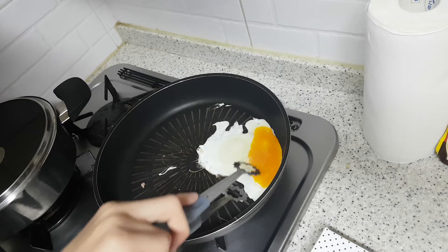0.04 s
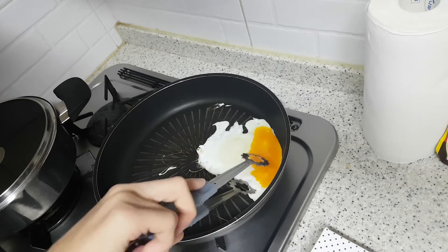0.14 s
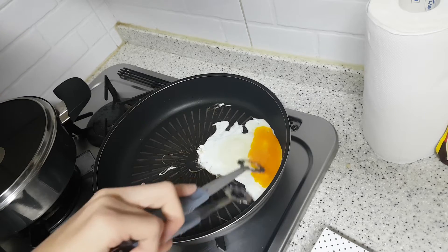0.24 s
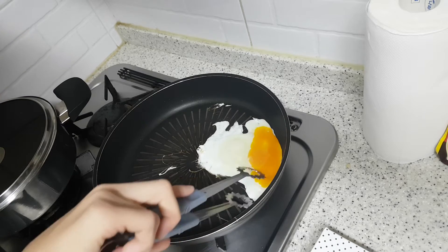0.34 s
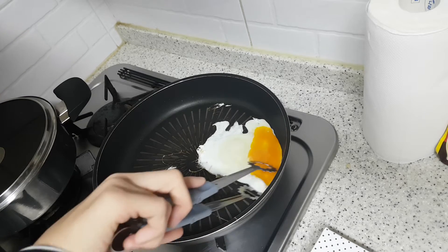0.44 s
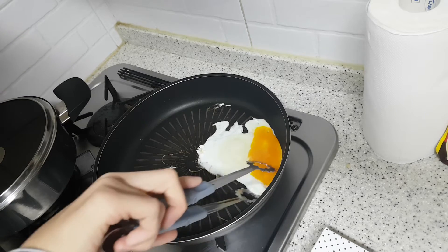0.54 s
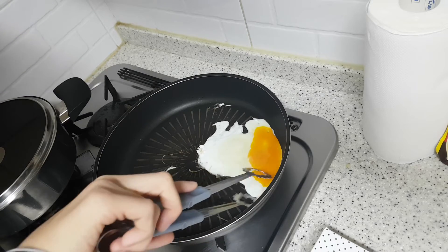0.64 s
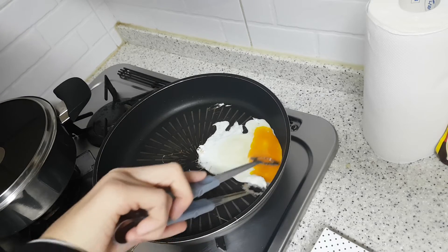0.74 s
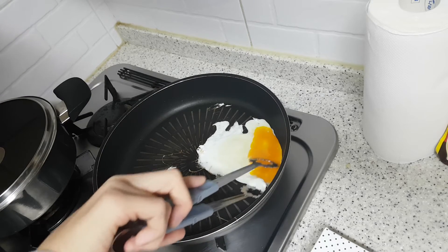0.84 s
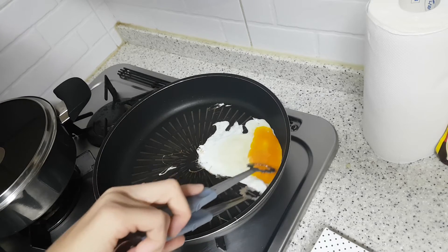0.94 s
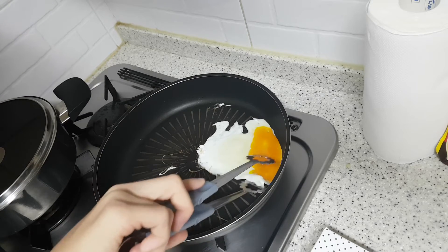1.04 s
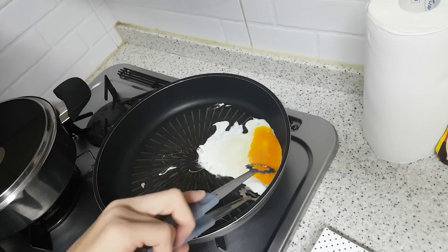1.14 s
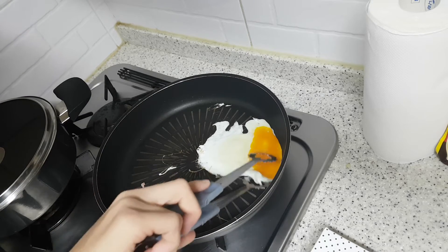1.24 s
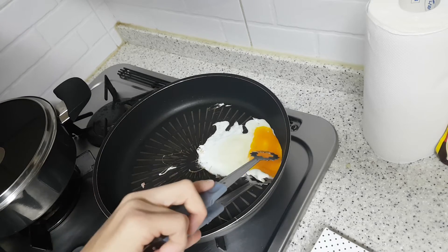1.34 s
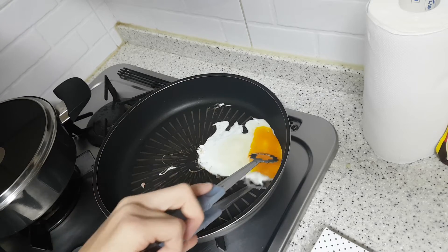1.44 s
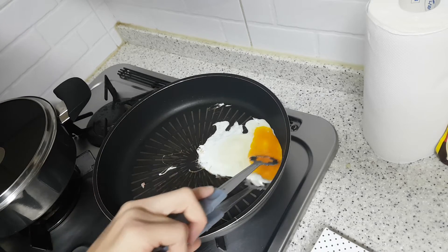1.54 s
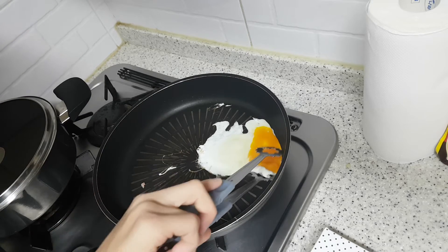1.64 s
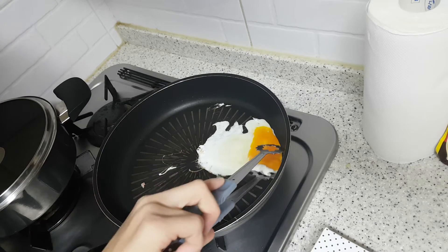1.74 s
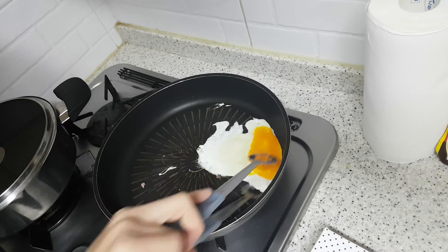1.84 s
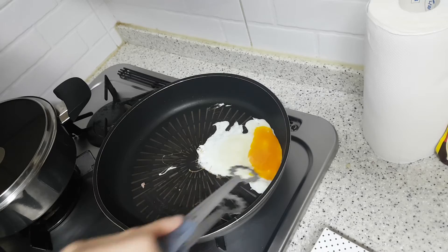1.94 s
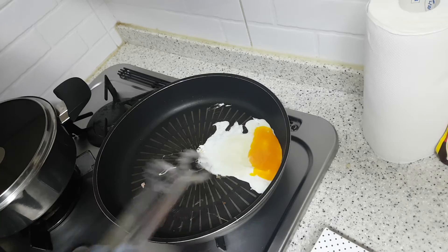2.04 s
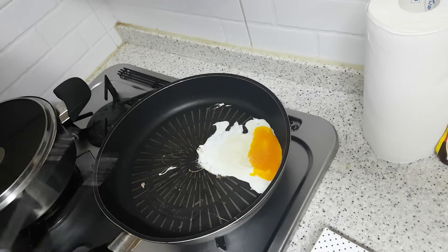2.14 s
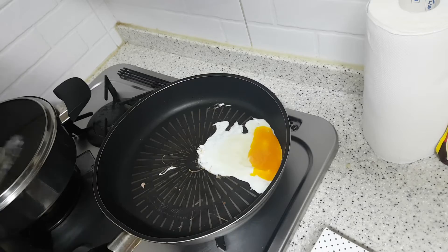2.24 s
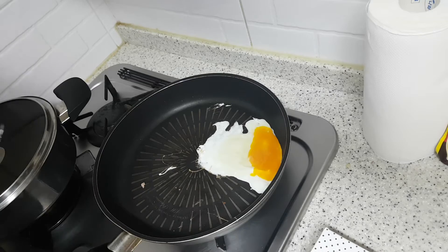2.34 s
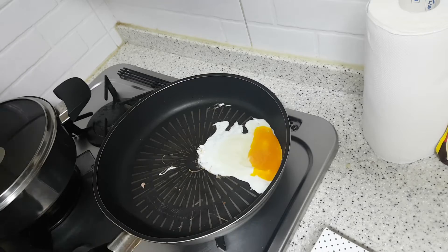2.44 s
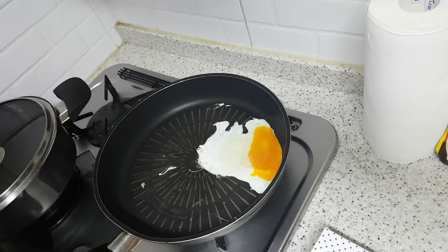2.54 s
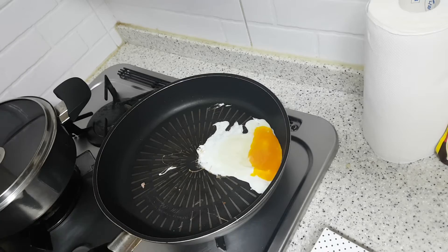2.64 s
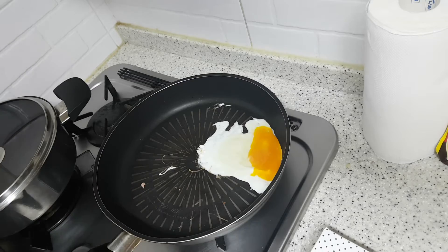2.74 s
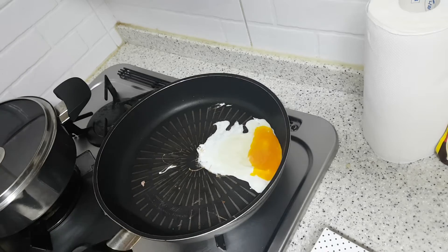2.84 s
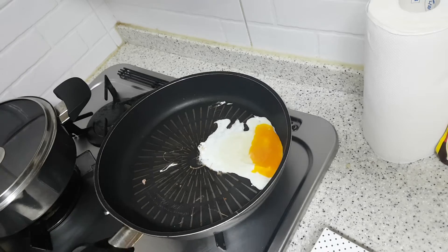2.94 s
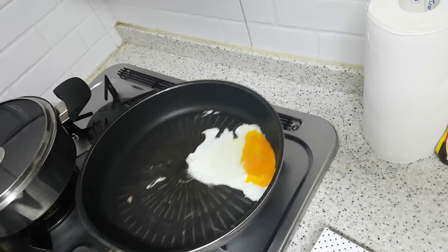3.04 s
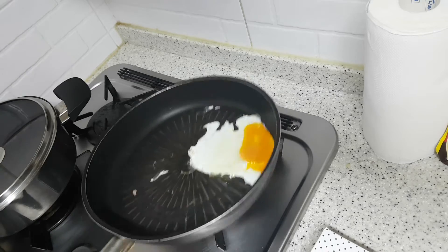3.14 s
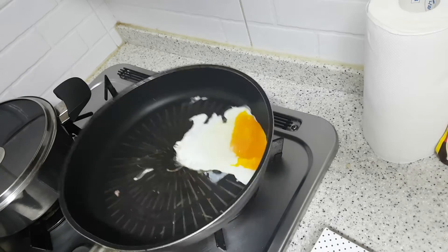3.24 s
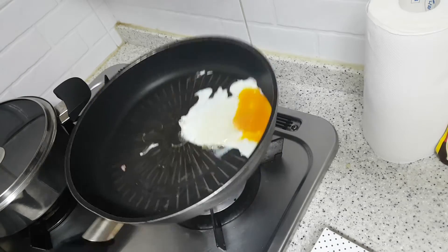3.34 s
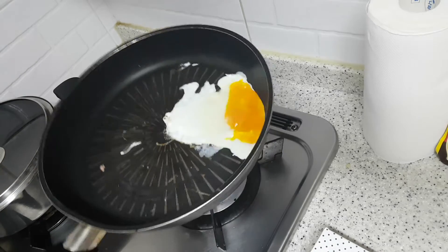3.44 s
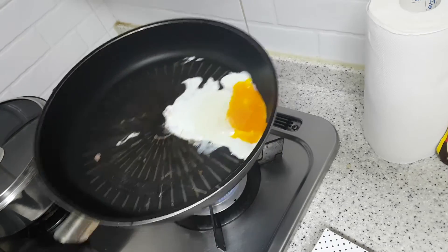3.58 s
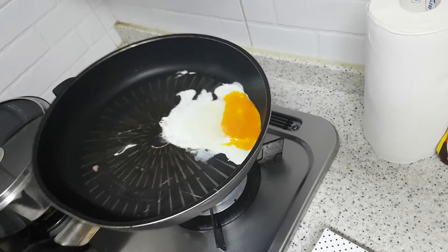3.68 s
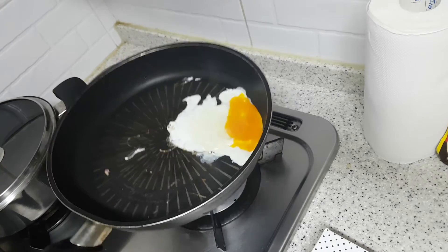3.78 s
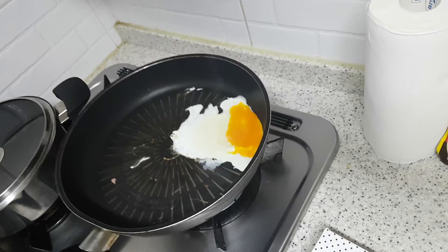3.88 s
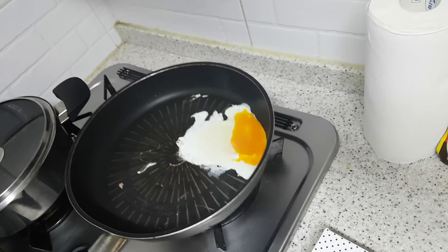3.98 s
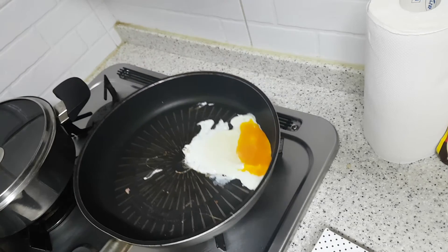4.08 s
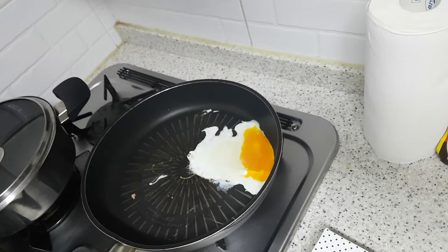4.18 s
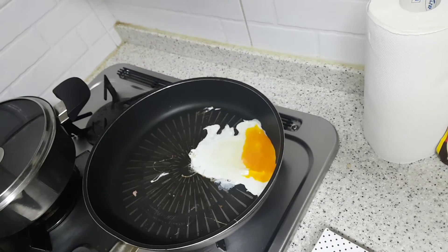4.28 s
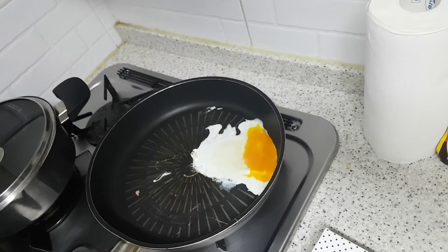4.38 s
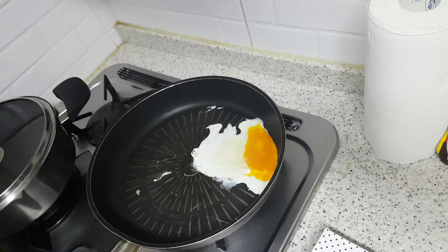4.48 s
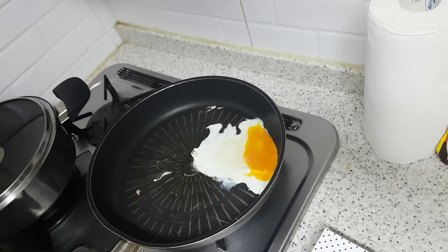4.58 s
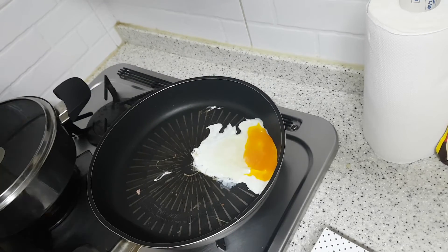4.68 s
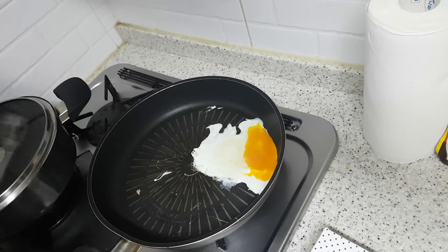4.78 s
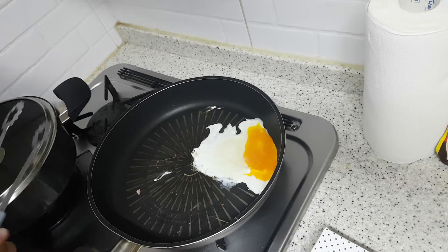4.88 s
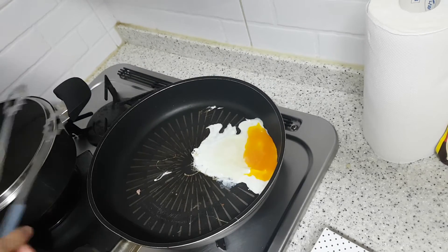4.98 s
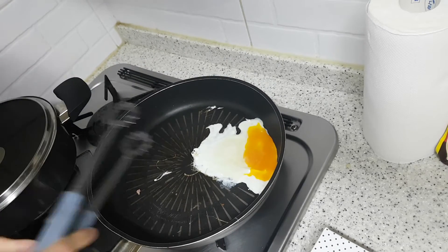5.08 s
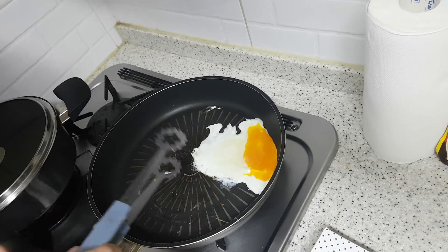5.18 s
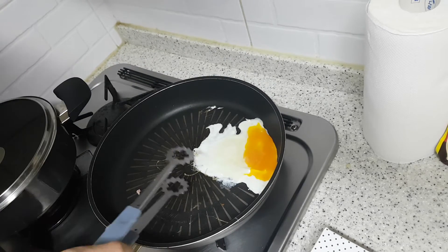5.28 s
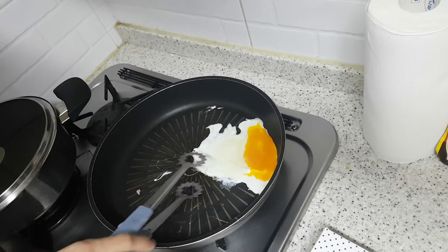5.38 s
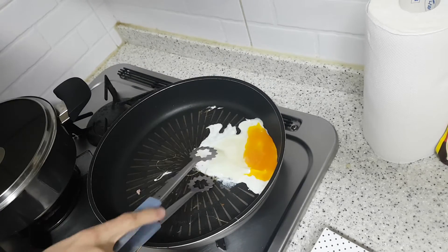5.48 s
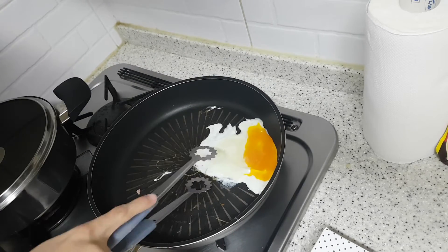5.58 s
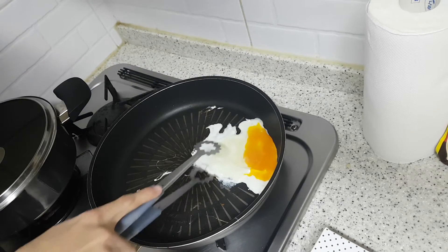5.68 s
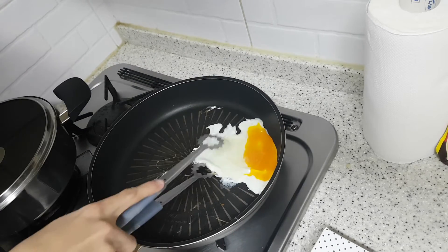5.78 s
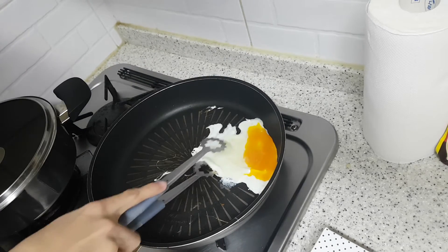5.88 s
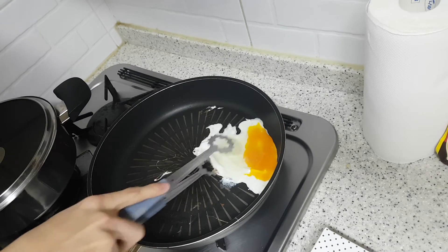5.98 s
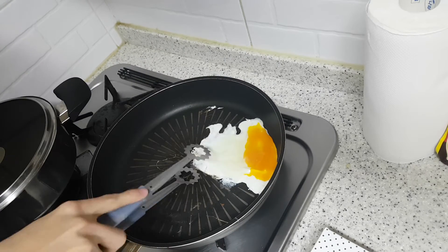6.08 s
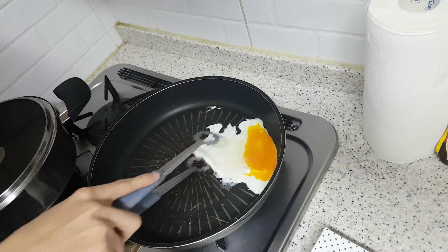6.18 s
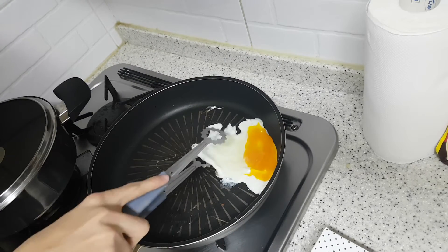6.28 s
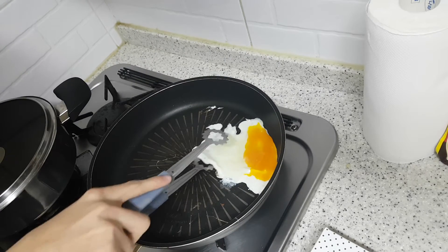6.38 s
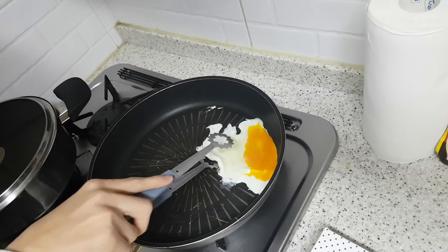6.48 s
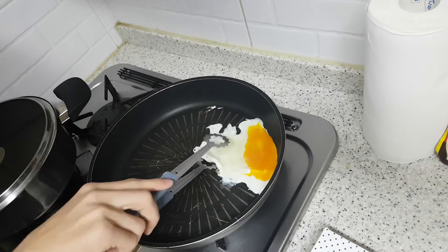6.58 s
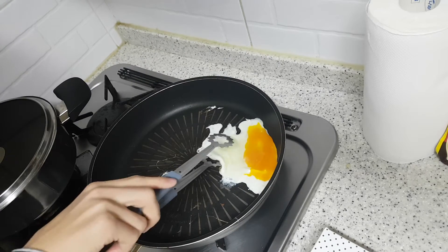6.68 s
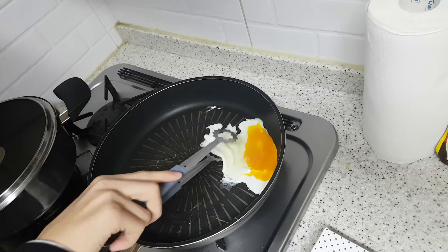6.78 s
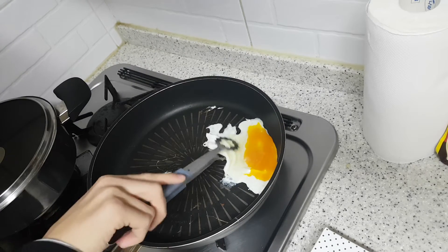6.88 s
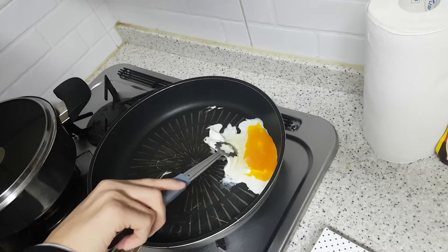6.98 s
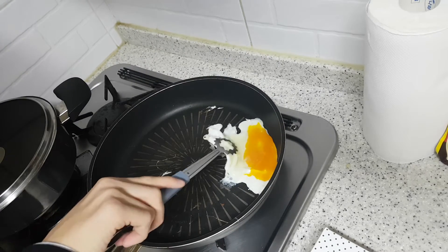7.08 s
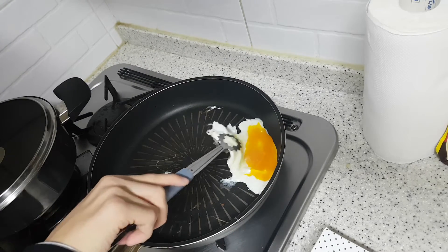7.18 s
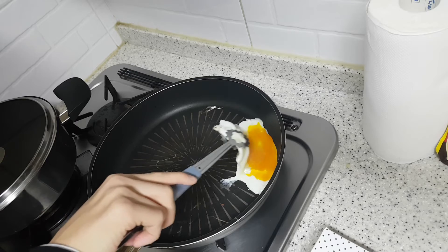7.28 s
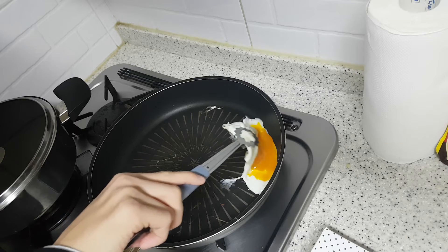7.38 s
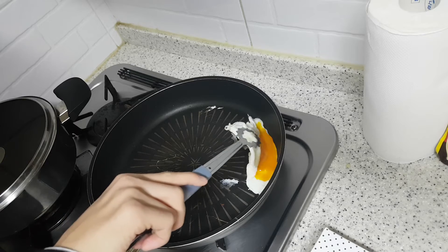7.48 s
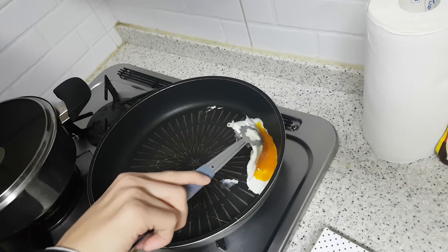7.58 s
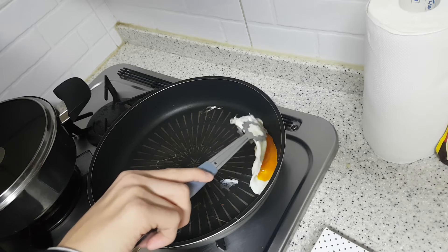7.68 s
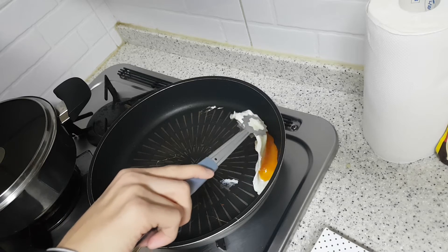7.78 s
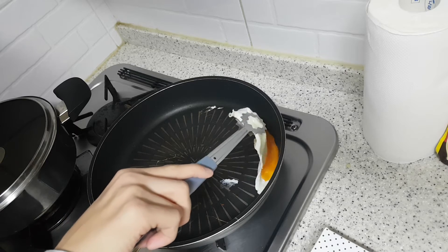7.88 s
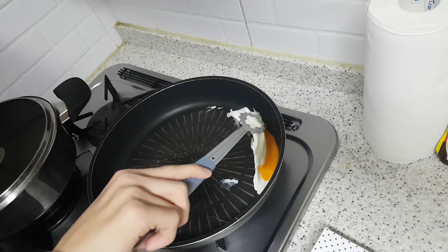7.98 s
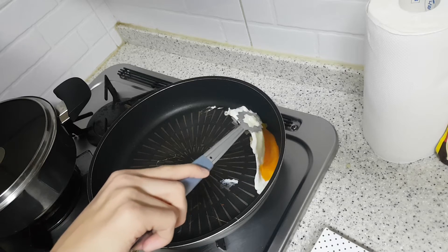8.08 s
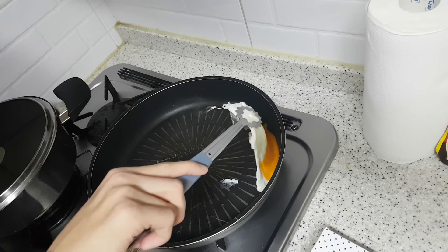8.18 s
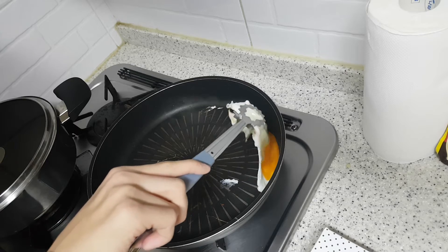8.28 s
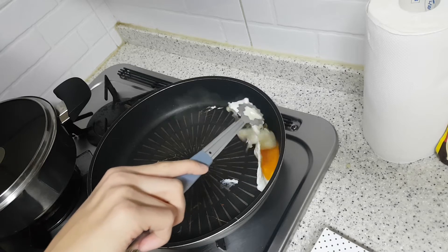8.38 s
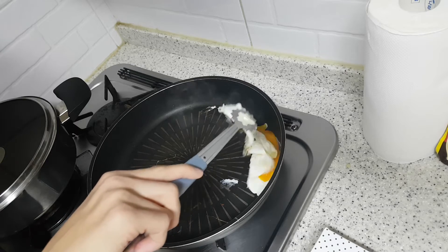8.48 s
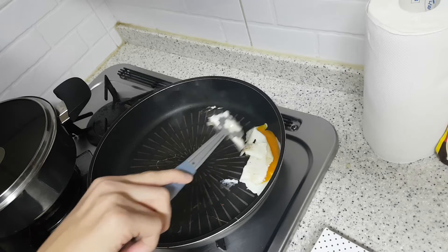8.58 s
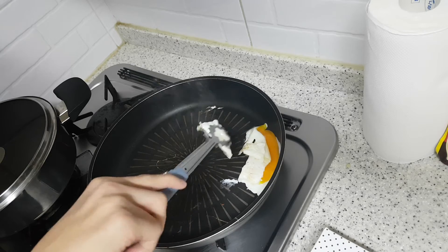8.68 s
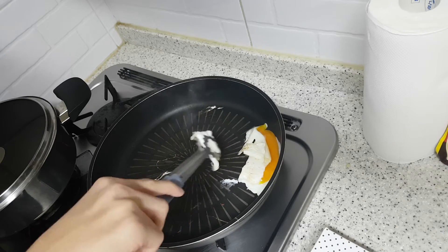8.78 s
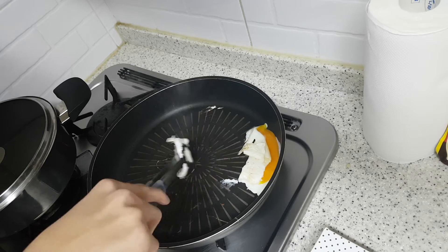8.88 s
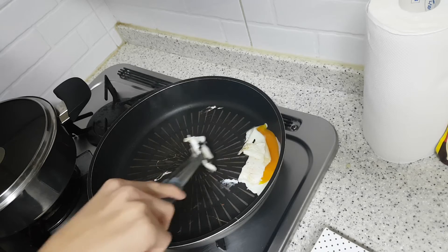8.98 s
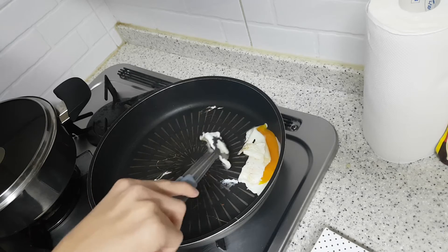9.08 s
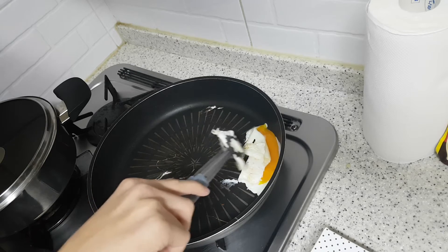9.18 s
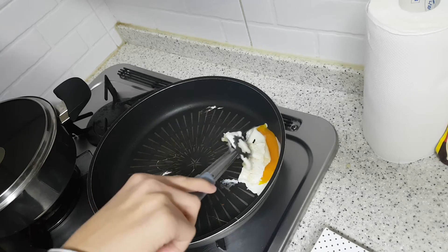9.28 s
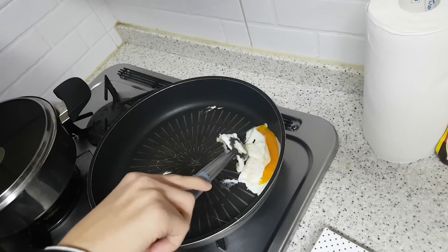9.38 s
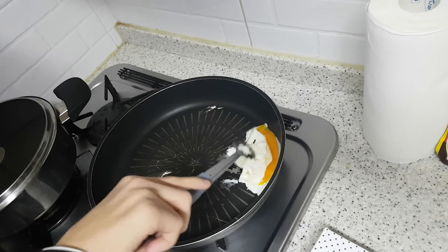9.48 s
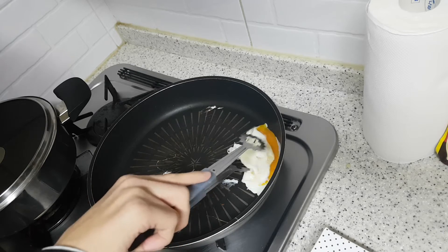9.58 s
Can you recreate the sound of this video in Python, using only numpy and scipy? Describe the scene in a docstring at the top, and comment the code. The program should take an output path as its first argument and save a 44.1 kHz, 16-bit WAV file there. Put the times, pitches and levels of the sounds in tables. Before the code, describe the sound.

Soft, close sizzling of a frying egg, with light taps and scrapes of metal tongs and the pan knocking against a gas stove.

```python
"""Oil fizzes and spits around an egg frying gently on a gas stove, heard close up in stereo
in a small tiled kitchen. Tiny bubbles make the sizzle, bursting drops of water the spits.
Metal tongs tap and scrape the pan, ringing it as they push the egg about. At 3 s the pan
is lifted off its grate, and just after 4 s it is set down again with a clatter.
The burner's steady rush and a faint low hum lie underneath."""
import sys
import numpy as np
from scipy import signal
from scipy.fft import rfft, irfft, next_fast_len
from scipy.io import wavfile

SR = 44100
rng = np.random.default_rng(int(sys.argv[2]) if len(sys.argv) > 2 else 0)


def unload_wav(signal):
    """Save mono or channel-first audio to the path in sys.argv[1] as 16-bit WAV at rate SR, clipped to [-1, 1]."""
    wavfile.write(
        sys.argv[1],
        SR,
        np.round(np.clip(np.atleast_2d(signal).T, -1, 1) * 32767).astype(np.int16),
    )


N = 424683
TIME = np.arange(N) / SR

# The finest bubbles. Each row: frequency in Hz, level in dB.
FIZZ_SPECTRUM = [(500, 2), (2000, -14.5), (5000, -2), (7000, 0), (8600, 4.5), (10000, -1.5), (13000, 1),
                 (16000, -7.5)]
# The pan's clear notes. Each row: frequency in Hz, relative level in dB, t60 in seconds.
PAN_MODES = [(259.4, 13, 0.29), (517, 14, 0.32), (757, 3.5, 0.09), (885, 7, 0.095), (1276, 5, 0.046),
             (1395, 8, 0.12), (1752, 7, 0.063), (1922, 4.5, 0.047), (2528, 8, 0.055), (2560, 7, 0.1),
             (2590, -8, 0.2), (4540, 10.5, 0.13), (5400, 6.5, 0.067)]
# The pan's dense ring. Each row: band centre in Hz, t60 in seconds.
PAN_DECAY = [(250, 0.65), (1200, 0.37), (5000, 0.17)]
# How alike the two microphones sound. Each row: frequency in Hz, left-right correlation.
MIC_CORRELATION = [(100, .99), (350, .9), (800, .66), (2000, .52), (12000, .45)]


def frying_oil():
    """Sputter, fizz, ticks and spits; the frying dies down when the egg is pushed up the pan's side."""
    # Each row: time in seconds, relative level of the low sputter in dB, of the high fizz in dB.
    frying = [(0, -51.5, -51.5), (0.7, -44, -54), (0.95, -50.0, -50), (1.8, -48.5, -54.0),
              (2.2, -47.5, -52), (2.7, -47.0, -56.5), (3.3, -46.5, -49), (3.6, -50.5, -59.0),
              (5.25, -54.5, -68), (5.65, -57.5, -62), (5.8, -48.5, -53.0), (7.3, -50, -50.5),
              (7.75, -55, -54.5), (8.05, -60, -62.5), (8.4, -63.5, -71), (8.8, -54, -56.5), (9.3, -60, -64),
              (9.63, -52.5, -54.5)]
    # Each row: frequency in Hz, level in dB.
    sputter_spectrum = [(300, -10.5), (700, -5.5), (1250, 1), (1800, -0.5), (2500, 0.5), (3600, -3),
                        (4600, -4.5), (6500, -10), (10000, -18), (16000, -27)]
    times, *levels = np.transpose(frying)
    sputter_db, fizz_db = (np.interp(TIME, times, db) for db in levels)
    sputter = sizzle(sputter_spectrum, sputter_db - .8, per_s=1200, spread_db=4.5,
                     hiss_db=-6, flutter_db=2.5)
    fizz = sizzle(FIZZ_SPECTRUM, fizz_db, per_s=600, spread_db=5.5, hiss_db=-3.5, flutter_db=5)
    return sputter + fizz + ticks(fizz_db - 13.5) + spits(small_drops(fizz_db))


def sizzle(spectrum, level_db, per_s, spread_db, hiss_db, flutter_db, spots=6):
    """Tiny bubbles burst at several spots in the oil, over a smooth hiss of steam."""
    gain = from_db(level_db + flutter_db * drift(35))
    bubbles = np.zeros((2, N))
    for _ in range(spots):
        clicks = grains(per_s / spots, spread_db) * gain
        burst = bubble_burst(spectrum, splash_db=-9.5, splash_s=.0064, room_db=-24)
        bubbles += signal.oaconvolve(clicks[None], burst, axes=1)[:, :N]
    steam = from_db(level_db + hiss_db) * noise(spectrum)
    return bubbles / np.sqrt(spots) + steam


def spits(small, gain_db=14.5, body_db=7):
    """Drops of water, big and small, burst here and there in the oil."""
    # Each row: start in seconds, relative level in dB, middle range against treble in dB.
    big = [(0.0444, -29, -3), (.189, -23, -8.5), (0.396, -25.5, -13), (1.6314, -27.5, -12),
           (1.911, -30.5, 0), (2.6, -26.5, 1.5), (3.4117, -16, -10), (4.141, -29, -0.5),
           (4.987, -26.5, -21), (5.387, -26.5, -1), (5.8217, -24.5, -10), (5.9361, -24, -6),
           (6.3357, -24, -6), (7.3085, -27.5, -13), (7.479, -26, -6), (7.722, -25, -6), (7.7903, -26.5, -8),
           (8.905, -30, -6), (9.039, -34.5, 1.5), (9.1705, -26, -15.5), (9.3621, -34, -4)]
    # Each row: frequency in Hz, level in dB.
    spectrum = [(180, -38), (300, -5.5), (1460, 0.5), (1690, 3.5), (1970, 4), (3080, 2.5), (5250, -2),
                (13100, 2.5), (16000, -7)]
    out, drops = np.zeros((2, N)), big + small
    for (s, db, middle_db), side_db in zip(drops, rng.standard_normal(len(drops))):
        tilt = [(2000, middle_db + body_db), (6000, 0)]
        colour = [(hz, level + at_hz(tilt, hz)) for hz, level in spectrum]
        fullness = np.sqrt(1 + from_db(middle_db) ** 2)
        gain = from_db(db + gain_db + side_db * np.array([[1], [-1]]))
        burst = bubble_burst(colour, splash_db=-13.5, splash_s=.0042, room_db=-24.5)
        add(out, s, gain * fullness * burst)
    return out


def small_drops(fizz_db, follow=.31):
    """Small drops burst all the time, louder the harder the egg fries; gives rows for spits()."""
    times, size, colour = loosely_spaced(0, N / SR, per_s=7).T
    swing_db = np.interp(times, TIME, fizz_db - fizz_db.mean())
    level_db = -35 + follow * swing_db + 3.5 * size
    middle_db = -16.5 + 13 * colour
    return list(zip(times, level_db, middle_db))


def ticks(level_db):
    """Tiny dry bubbles give scattered sharp ticks."""
    tick = bubble_burst(FIZZ_SPECTRUM, splash_db=-20, splash_s=.0015, room_db=-40)
    clicks = from_db(level_db) * grains(per_s=36, spread_db=3)
    return signal.oaconvolve(clicks[None], tick, axes=1)[:, :N]


def bubble_burst(spectrum, splash_db, splash_s, room_db, room_t60=.24, size=4096):
    """A bursting bubble: a spike, quick reflections in the pan, then the tiled room; energy 1."""
    t = np.arange(size) / SR
    hz, bins = noise_bins(size)
    splash = from_db(splash_db) * np.exp(-t / splash_s)
    room = from_db(room_db - 60 * t / room_t60)
    burst = irfft(bins) * (splash + room)
    burst[:, 0] += 1
    # minimum phase: nothing sounds before the burst
    cepstrum = irfft(np.log(from_db(at_hz(spectrum, hz))))
    cepstrum[1:size // 2] *= 2
    cepstrum[size // 2 + 1:] = 0
    return rms_one(irfft(rfft(burst) * np.exp(rfft(cepstrum)))) / np.sqrt(size)


def tongs():
    """The tongs nudge the egg about, each nudge a light tap and a short scrape, among firmer moves."""
    # Each row: start in seconds, end in seconds, relative level in dB.
    spells = [(0, 1.4, -52.5), (6.55, 7.9, -57.5), (8.85, 9.1, -58)]
    nudges = [(s, db + 4.5 * luck) for start, end, db in spells
              for s, luck, _ in loosely_spaced(start, end, per_s=5)]
    light_taps = [(s, db + 14, -21, -22) for s, db in nudges]
    light_strokes = [(s, .045, db) for s, db in nudges]
    return taps(light_taps) + scrapes(light_strokes) + clinks()


def taps(light_taps, gain_db=-29, bass_db=1.5, treble_db=8.5, modes_db=2.5):
    """The tips of the tongs strike the pan."""
    # Each row: start in seconds, relative level in dB, bass and treble against the middle in dB.
    firm_taps = [(.384, -25, -25, -14.5), (.567, -20.5, -20.5, -17), (.671, -27.5, -23, -23),
                 (.734, -29, -12, -14), (.881, -30.5, -22, -36), (1.219, -31, -33, -20),
                 (2.023, -23.5, -14, -15.5), (2.344, -29.5, -26, -13), (4.742, -32.5, -21, -38),
                 (4.931, -32, -34, -32), (5.079, -26, -21, -27), (5.683, -29, -14, -12.5),
                 (6.059, -24.5, -31, -33), (6.864, -28, -15, -17.5), (7.872, -38.5, -32, -20),
                 (9.52, -34.5, -31, -13), (9.547, -16, -31, -18)]
    # The struck pan. Each row: frequency in Hz, level in dB.
    spectrum = [(60, -2), (260, -5.5), (400, -9), (880, -5), (1350, -4.5), (1800, -6), (2200, -2),
                (2560, -3.5), (2900, -10), (5200, 2.5), (7200, -5), (15000, -10.5)]
    out = np.zeros((2, N))
    modes = [(hz, db + modes_db, t60) for hz, db, t60 in PAN_MODES]
    for s, db, bass, treble in firm_taps + light_taps:
        range_db = db + gain_db + np.array([bass + bass_db, 0, treble + treble_db])
        add(out, s, contact(spectrum, modes, PAN_DECAY, range_db, crack_s=.0067, tail_db=-6.5))
    return out


def scrapes(light_strokes, gain_db=2, slips_per_s=450, modes_db=1):
    """The tongs stick and slip, ringing the pan. Light strokes judder low, firm ones sing higher."""
    # Each row: start in seconds, length in seconds, relative level in dB.
    firm_strokes = [(.733, .1, -46.5), (1.045, 0.045, -46), (2.027, .03, -38), (5.466, 0.094, -44),
                    (5.688, 0.14, -44), (6.109, .012, -29), (6.126, .024, -31.5), (6.215, 0.096, -41),
                    (6.469, 0.078, -46.5)]
    # The scraped pan. Each row: frequency in Hz, level in dB.
    spectrum = [(60, -13), (260, -3.5), (400, -21), (680, -1), (880, 2), (1080, -34), (1330, 5.5),
                (1530, -19), (1790, 0), (2250, -19), (2560, -2.5), (2950, -24), (5000, -9), (14000, -24)]
    out = np.zeros((2, N))
    for s, length, db in firm_strokes + light_strokes:
        size = int(length * SR)
        slips = rng.permutation(size) < max(length * slips_per_s, 2)
        force = slips * rng.choice([-1, 1], size) * from_db(2 * rng.standard_normal(size))
        force *= np.hanning(size) ** .065
        firm_db = max(db + 43.5, 0)
        modes = [(hz, level + modes_db + .4 * firm_db * np.log2(min(hz, 2600) / 1000), t60)
                 for hz, level, t60 in PAN_MODES]
        range_db = [-7 - 1.1 * firm_db, 0, -8 - .18 * firm_db]
        ring = contact(spectrum, modes, PAN_DECAY, range_db, crack_s=.0015, tail_db=-13.5)
        scrape = signal.fftconvolve(force[None], ring, axes=1)
        add(out, s, from_db(db + gain_db) * rms_one(scrape) * np.sqrt(size / scrape.shape[1]))
    return out


def clinks(size=24000):
    """The two steel arms of the tongs meet and ring freely."""
    # Each row: start in seconds, level in dB, tilt towards the upper modes in dB per octave.
    meetings = [(0.566, -38, 7), (2.024, -34, -5)]
    # Each row: frequency in Hz, relative level in dB, t60 in seconds.
    arm_modes = [(1570, 2, 0.2), (2055, -10.5, 0.99), (2630, -1, 0.26), (2990, 2.5, 0.076),
                 (3440, 0, 0.084), (4200, 0, 0.12)]
    out, t = np.zeros((2, N)), np.arange(size) / SR
    for s, db, tilt in meetings:
        for hz, level, t60 in arm_modes:
            fall = from_db(db + level + tilt * np.log2(hz / 2000) - 60 * t / t60)
            add(out, s, fall * np.sin(2 * np.pi * hz * t + .5 * rng.standard_normal((2, 1))))
    return out


def grate_knocks(gain_db=-25, bass_db=2.5, treble_db=.5, rebound_s=.043):
    """The pan bumps the grate and rocks back once, softer; the sheet-metal stove top booms under it."""
    # Each row: start in seconds, relative level in dB, bass and treble against the middle in dB.
    knocks = [(2.959, -25, 1.5, -38), (3.008, -11, -13, -5), (3.068, -17.5, -4.5, -59),
              (3.199, -26, -13, -21), (3.95, -40, -7.5, -30), (4.243, -4.5, -17.5, -13),
              (4.259, -9, -9, -8), (4.354, -7, -19.5, -13.5), (4.417, -6.5, -15, -5)]
    # Grate and stove top. Each row: frequency in Hz, level in dB.
    spectrum = [(18, -48), (30, -13), (115, -5.5), (161, -6.5), (194, -5.5), (404, -10.5), (526, -12),
                (801, -17), (2010, -14.5), (3670, -19.5), (4650, -15), (5900, -26), (6900, -26),
                (12000, -32), (16000, -48)]
    # Their clear notes. Each row: frequency in Hz, level over the dense ring in dB, t60 in seconds.
    modes = [(116, 7.5, 0.17), (193.7, 11, 0.33), (526, 8.5, 0.36), (656, 3, 0.21), (772.5, 7, .15),
             (900, 4.5, 0.27), (944, 6, 0.13), (1577, -0.5, 0.076), (1974, 2, 0.14), (2040, 9.5, 0.13),
             (2400, 6.5, 0.066), (3250, 7, 0.11), (4320, 10.5, 0.2), (4580, 6, 0.24), (4710, 10, 0.23),
             (5300, 4, .15), (5380, 9, 0.16), (5440, 15, 0.16), (6640, 3, 0.11), (7220, 4, 0.21),
             (8260, 11, .13), (8800, 11, 0.073)]
    # Their dense ring. Each row: band centre in Hz, t60 in seconds.
    decays = [(60, 1), (160, 0.42), (420, 0.38), (1100, 0.29), (2900, 0.28), (8000, 0.23)]
    out = np.zeros((2, N))
    rebounds = [(s + rebound_s, db - 13.5, -3, -24) for s, db, _, _ in knocks]
    for s, db, bass, treble in knocks + rebounds:
        range_db = db + gain_db + np.array([bass + bass_db, 0, treble + treble_db])
        add(out, s, contact(spectrum, modes, decays, range_db, crack_s=.0061, tail_db=-3, size=24000))
    return out


def contact(spectrum, modes, decays, range_db, crack_s, tail_db, size=12000):
    """Metal meets metal: a crack, a dense ring that dies by band and a few clear modes."""
    # Bass, middle and treble. Each row: lower edge in Hz, upper edge in Hz.
    ranges = [(60, 400), (600, 3000), (4000, 15000)]
    t = np.arange(size) / SR
    hz, bins = noise_bins(size)
    shape = from_db(at_hz(spectrum, hz))
    # the hardness of the contact shares the energy out between the ranges, as range_db sets
    shifts = []
    for (lo, hi), db in zip(ranges, range_db):
        energy = np.sum(shape[(hz > lo) & (hz < hi)] ** 2) * hz[1]
        shifts.append((np.sqrt(lo * hi), db - 10 * np.log10(energy)))
    shape *= from_db(at_hz(shifts, hz))
    press_s = .0042 * from_db(min(range_db[0] - range_db[1], 0)) ** 2   # heavy contacts press in slowly
    out, centres = np.zeros((2, size)), [centre for centre, _ in decays]
    for weights, (centre, t60) in zip(np.eye(len(decays)), decays):
        band = irfft(bins * shape * at_hz(list(zip(centres, weights)), hz)) * np.sqrt(SR / 2)
        fall = np.exp(-t / (crack_s + 1 / centre)) + from_db(tail_db - 60 * t / t60)
        swell = 1 - np.exp(-t / (.5 / centre + press_s))   # low notes take longer to build up
        out += rms_one(band * fall * swell) * band.std() / np.sqrt(t[-1])
    for mode_hz, db, t60 in modes:
        luck_db, sign, skew, detune = rng.standard_normal(4)
        life_s = t60 / np.log(1000)
        height = from_db(db + luck_db) * np.interp(mode_hz, hz, shape) * np.sqrt(2) / life_s
        # high modes reach the two microphones less in step
        width = np.sqrt((1 - at_hz(MIC_CORRELATION, mode_hz)) / 2)
        phase = np.pi * (sign > 0) + skew * width * np.array([[1], [-1]])
        pitch_hz = mode_hz * (1 + .0025 * detune)
        out += height * np.exp(-t / life_s) * np.sin(2 * np.pi * pitch_hz * t + phase)
    return out


def burner(level_db=-56.5):
    """The gas flame: a steady low rush with a thin hiss near 9 kHz."""
    # Each row: frequency in Hz, level in dB.
    spectrum = [(20, -21), (42, 2.5), (58, -10), (110, -9), (170, -11), (270, -10), (400, -14.5),
                (700, -16.5), (1200, -33), (2300, -32), (5500, -52), (8600, -21), (8900, -20.5),
                (9200, -27), (16000, -28)]
    return from_db(level_db) * noise(spectrum)


def hum(hz=79.5):
    """A faint low hum whose level wavers."""
    return from_db(-63 + 2.9 * drift(6)) * np.sin(2 * np.pi * hz * TIME)


def at_microphones(x, lean, lead_s):
    """The sound reaches the left microphone first; lean scales the difference in level."""
    # Each row: frequency in Hz, left minus right in dB at a lean of 1.
    balance = [(150, 0.5), (700, 0.5), (1400, -1.5), (5000, -7), (9000, 0), (15000, 5)]
    size = next_fast_len(N + 4096)
    hz = np.fft.rfftfreq(size, 1 / SR)
    bins = rfft(x, size) * from_db(lean * at_hz(balance, hz) / 2 * [[1], [-1]])
    bins[1] *= np.exp(-2j * np.pi * hz * lead_s)
    return irfft(bins, size)[:, :N]


def noise_bins(size):
    """Frequencies and spectrum of stereo white noise, alike in the bass and less so in the treble."""
    hz = np.fft.rfftfreq(size, 1 / SR)
    alike = at_hz(MIC_CORRELATION, hz)
    mid, side = rfft(rng.standard_normal((2, size)))
    return hz, np.sqrt((1 + alike) / 2) * mid + np.sqrt((1 - alike) / 2) * side * [[1], [-1]]


def noise(spectrum):
    """Coloured stereo noise, rms 1."""
    size = next_fast_len(N)
    hz, bins = noise_bins(size)
    return rms_one(irfft(bins * from_db(at_hz(spectrum, hz)), size)[:, :N])


def grains(per_s, spread_db):
    """Random clicks, many small and a few large."""
    at = np.flatnonzero(rng.random(N) < per_s / SR)
    level_db = spread_db * np.minimum(rng.exponential(1, len(at)), 4.5)
    clicks = np.zeros(N)
    clicks[at] = from_db(level_db) * rng.choice([-1, 1], len(at))
    return rms_one(clicks)


def loosely_spaced(start, end, per_s):
    """One random moment per slot. Each row: time in seconds, two draws between -1 and 1."""
    slots = np.arange(start, end, 1 / per_s)
    late, *luck = rng.random((len(slots), 3)).T
    return np.column_stack([slots + late / per_s, 2 * np.transpose(luck) - 1])


def drift(per_s):
    """A random wander, rms 1."""
    knots = rng.standard_normal(int(N / SR * per_s) + 2)
    return rms_one(np.interp(TIME * per_s, np.arange(len(knots)), knots))


def from_db(db):
    """Decibels to gain."""
    return 10 ** (np.asarray(db) / 20)


def rms_one(x):
    """Scale to an rms of 1."""
    return x / np.sqrt(np.mean(x ** 2) + 1e-20)


def at_hz(points, hz):
    """Read a table on a log-frequency axis."""
    known, values = np.transpose(points)
    return np.interp(np.log(np.maximum(hz, 1)), np.log(known), values)


def add(out, s, sound):
    """Mix a sound in from time s."""
    start = max(round(s * SR), 0)
    out[:, start:start + sound.shape[1]] += sound[:, :max(N - start, 0)]


def scene():
    """Oil, tongs and grate at the microphone pair, over the burner and the hum."""
    oil = at_microphones(frying_oil(), lean=.47, lead_s=.00005)
    handling = at_microphones(tongs(), lean=.68, lead_s=.00006)
    clatter = at_microphones(grate_knocks(), lean=.76, lead_s=.00014)
    return oil + handling + clatter + burner() + hum()


def record(dry):
    """The deepest bass is lost, the highest peaks are rounded and the top is cut."""
    low_cut = signal.butter(4, 33, "high", fs=SR, output="sos")
    high_cut = signal.ellip(10, .1, 80, 16000, fs=SR, output="sos")
    rounded = 1.05 * np.tanh(signal.sosfilt(low_cut, dry) / 1.05)
    return signal.sosfilt(high_cut, rounded)


dry = scene()
out = record(dry)
unload_wav(out)
```